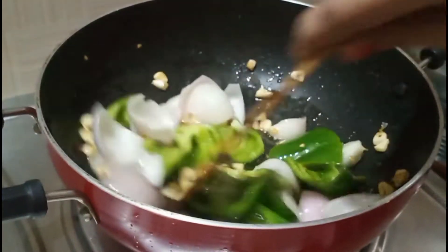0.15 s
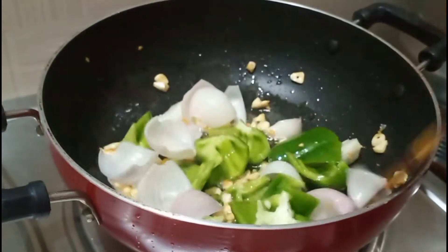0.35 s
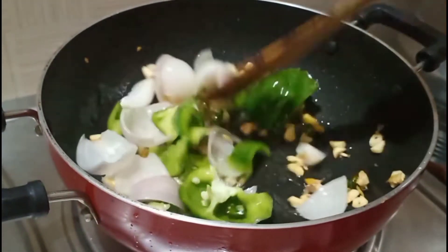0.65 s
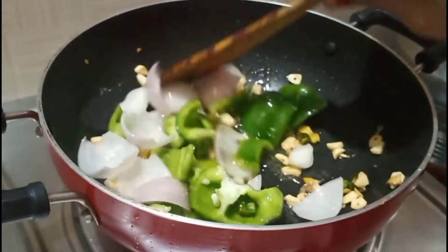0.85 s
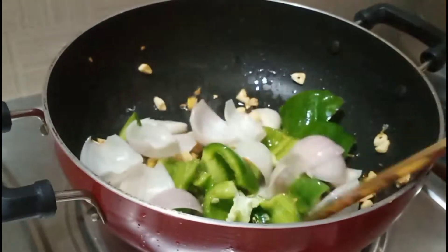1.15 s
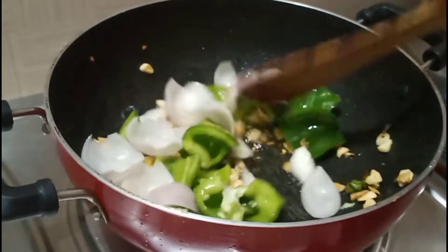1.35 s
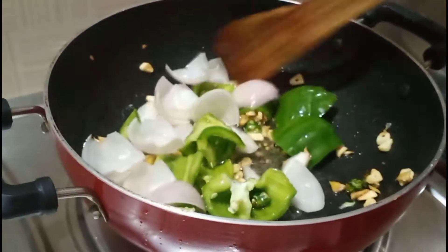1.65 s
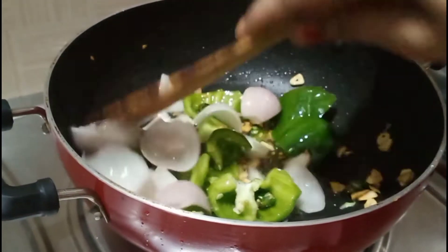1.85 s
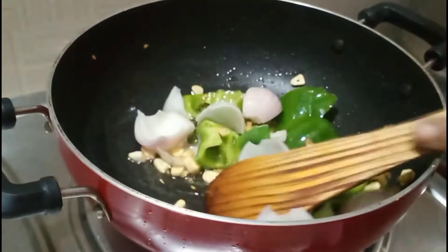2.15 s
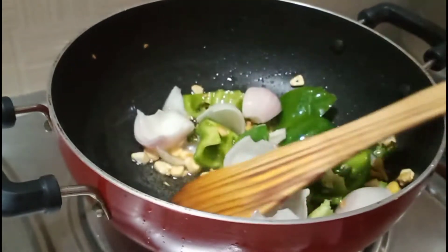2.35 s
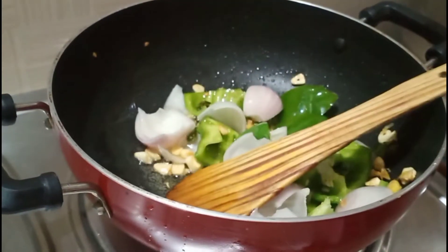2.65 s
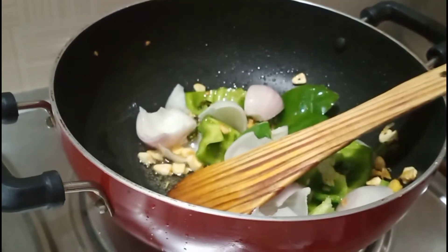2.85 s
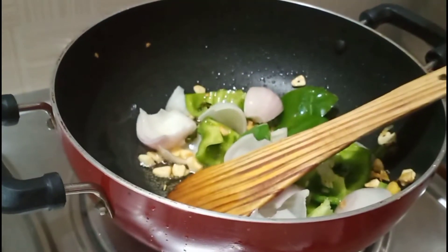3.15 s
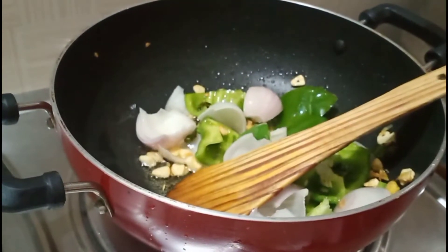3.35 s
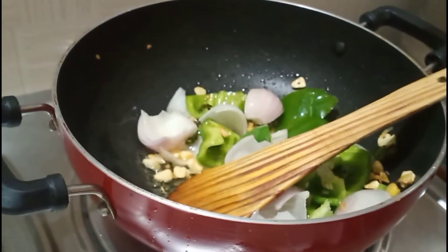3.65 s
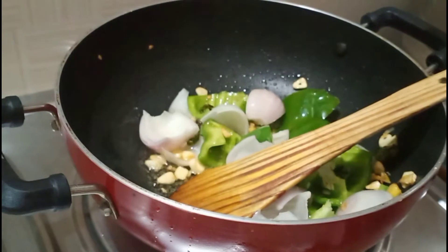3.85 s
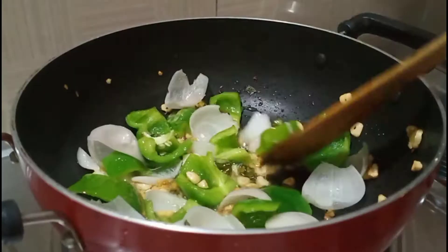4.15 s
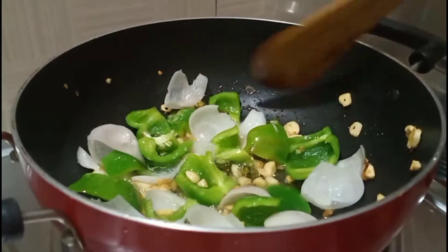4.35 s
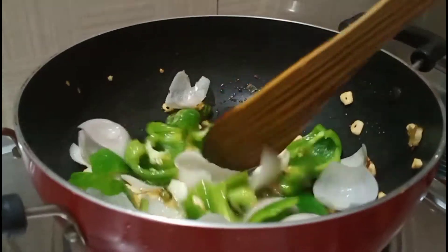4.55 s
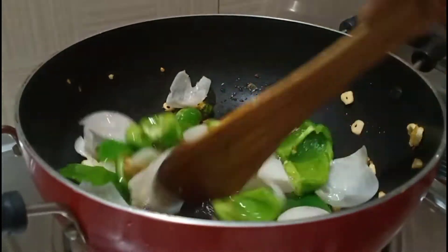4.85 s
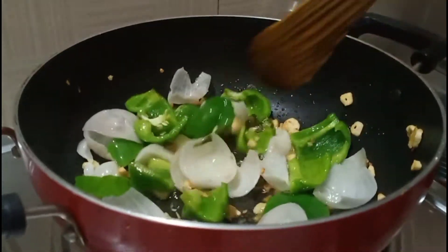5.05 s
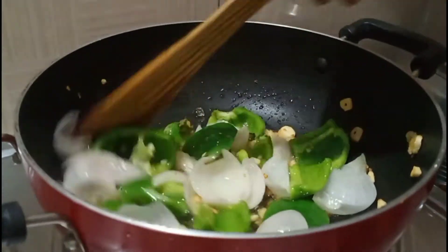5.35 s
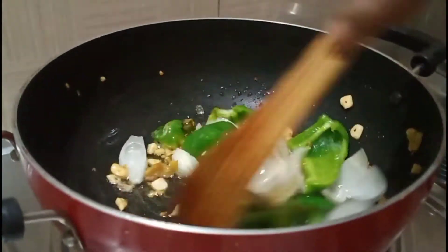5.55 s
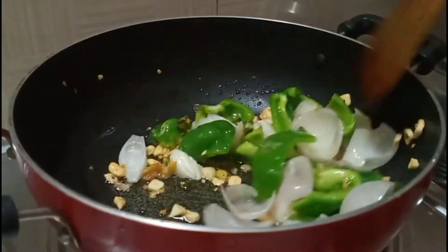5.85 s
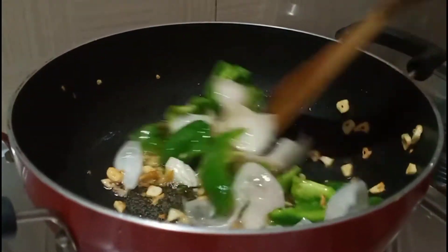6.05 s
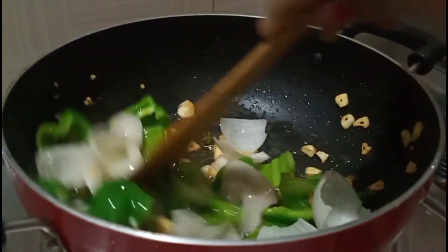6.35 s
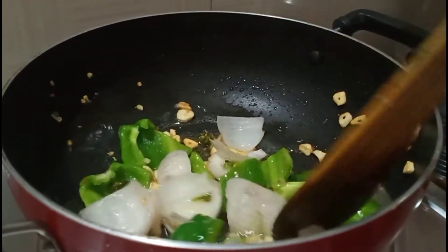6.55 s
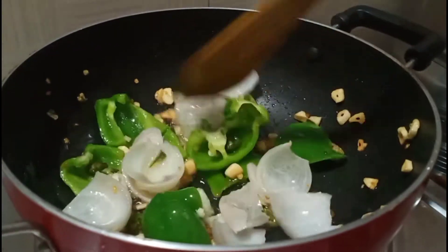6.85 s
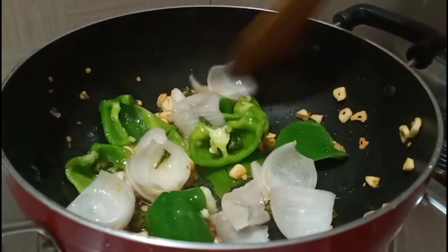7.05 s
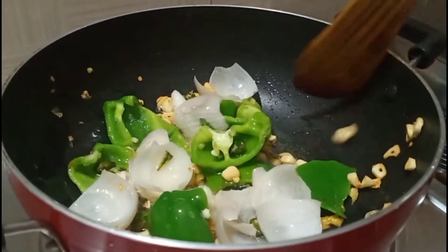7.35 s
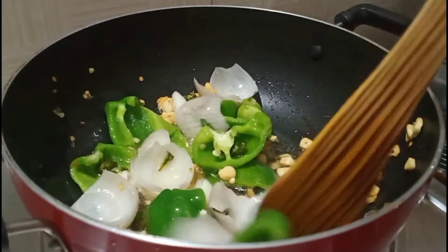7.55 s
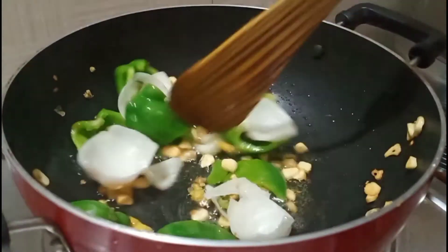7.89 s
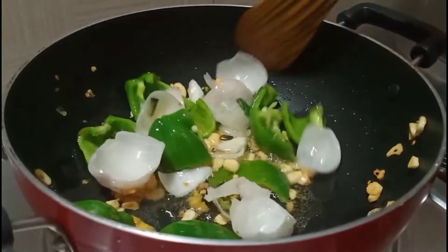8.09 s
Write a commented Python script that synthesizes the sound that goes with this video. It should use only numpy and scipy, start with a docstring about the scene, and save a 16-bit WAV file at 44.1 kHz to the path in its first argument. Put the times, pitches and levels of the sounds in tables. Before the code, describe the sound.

Chopped onion and pepper sizzle in oil while a wooden spatula scrapes and knocks a deep metal pan, with popping drops and one brief silent cut.

```python
"""Close on a deep metal pan, vegetable chunks sizzle in oil from the start over a low kitchen hum.
A wooden spatula scrapes and knocks it at once, ringing its modes; water drops pop as damped tones.
A phone close by hears it through two unlike ports; shortly after 2 s it has turned and the left dulls.
The sizzle sinks; just after 4 s all is cut to silence, then fades in again within half a second.
The sizzle, made of tiny noise bursts and bubble tones, grows again under more knocks, scrapes and rustles."""
import sys
import numpy as np
from scipy import signal
from scipy.fft import rfft, irfft, next_fast_len
from scipy.io import wavfile
from scipy.ndimage import uniform_filter1d, map_coordinates

SR = 44100
rng = np.random.default_rng(int(sys.argv[2]) if len(sys.argv) > 2 else 0)


def file_out(sig):
    """Save sig as 16-bit WAV at sys.argv[1]."""
    # one column per channel
    cols = np.atleast_2d(sig).T
    # limit, then scale
    lim = np.clip(cols, -1, 1)
    pcm = np.round(lim * 32767).astype(np.int16)
    wavfile.write(sys.argv[1], SR, pcm)


N = 362502  # samples

# Source levels are ahead of the port colours and the cut.
# sizzle before its surges: [t/s, bubbling level/dB, fizz level/dB]
SIZZLE_LEVELS = [(0.0, -31, -25.5), (0.25, -31.5, -23.5), (0.41, -32.5, -27.5), (0.61, -31.5, -24.5),
                 (0.76, -37.5, -25.5), (1.06, -33.5, -28.5), (1.19, -40, -31.5), (1.56, -37, -28.5),
                 (2.03, -37, -32), (3.0, -41.5, -36.5), (3.9, -41.5, -34), (4.5, -46.5, -33.5),
                 (4.68, -48.5, -36), (5.06, -43.5, -35.5), (5.48, -48, -36), (5.62, -43.5, -32),
                 (6.03, -37.5, -33), (6.35, -39.5, -29.5), (6.7, -40.5, -33.5), (7.2, -39, -29),
                 (8.22, -42.5, -28.5)]
# colour of the bubbling noise: [f/Hz, level/dB per Hz]
BUBBLING_COLOUR = [(500, -65), (900, -51), (1300, -23.5), (1800, -5), (2150, 6), (3500, 6.5), (4600, 2.5),
                   (5500, -33.5), (8000, -59.5)]
# colour of the fizz: [f/Hz, level/dB per Hz]
FIZZ_COLOUR = [(2500, -30), (4500, -7.5), (6000, -0.5), (10000, 0), (15000, -5.5), (20000, -4)]
# modes of the metal pan: [f/Hz, level/dB, free t60/s]
PAN_MODES = [(204.5, 2, 0.16), (283, 3, 0.11), (350.6, -1.5, 0.12), (418.5, -1.5, 0.53), (510, -3, 0.75),
             (616, -1, 0.42), (658.4, -4, 0.1), (805, 0.5, 0.33), (895, 7.5, 0.18), (1076, 2.5, 0.48),
             (1359, 8.5, .1), (1634, -3.5, 0.11), (2139, 1, 0.16), (2436, -18, 0.13), (2736, 0.5, 0.33),
             (3884, -7.5, 0.12), (4800, -14.5, 0.15)]
# colour of the low rumble: [f/Hz, level/dB per Hz]
RUMBLE_COLOUR = [(20, -30.5), (60, -16), (85, -9), (99, 1.5), (115, -13), (150, -12.5), (200, -9.5),
                 (260, -31.5)]
# rustle of shifting food, ahead of the pan's answer: [t/s, level/dB]
RUSTLE_LEVELS = [(0.0, -41.5), (0.74, -48), (1.0, -45), (1.7, -41.5), (2.7, -47.5), (3.9, -49), (4.5, -46),
                 (4.7, -55), (5.7, -47.5), (6.24, -49), (7.06, -47.5), (7.55, -35), (7.93, -49),
                 (8.22, -40)]
# colour of that rustle: [f/Hz, level/dB per Hz]
RUSTLE_COLOUR = [(150, -5.5), (250, -3.5), (420, 2.5), (700, -4.5), (1100, -10.5), (1500, -1),
                 (1900, -12.5), (2600, -19.5)]
# spatula strokes, and a few soft rustles in the pan: [t/s, hold/s, rasp level/dB, rasp f/Hz,
# shudder level/dB, shudder f/Hz at the start, grit level/dB]
STROKES_AND_RUSTLES = [(0.0, 0.095, -30.5, 970, -71, 400, -30.5), (0.102, 0.049, -22, 643, -15, 430, -32),
                       (0.46, 0.014, -24.5, 766, -17, 530, -30.5), (0.516, 0.08, -32, 960, -47, 331, -26.5),
                       (1.209, 0.1, -32.5, 740, -28, 386, -34.5), (1.709, 0.017, -24, 905, -84, 303, -32),
                       (1.803, 0.046, -26, 680, -59, 590, -29), (1.877, 0.017, -14, 855, -58, 625, -36),
                       (2.1, 0.054, -38.5, 950, -75, 400, -37.5),
                       (2.232, 0.037, -30.5, 1620, -31.5, 454, -53),
                       (4.619, 0.029, -42.5, 1430, -60.5, 407, -52),
                       (5.41, 0.0099, -31.5, 680, -36, 352, -28), (5.451, 0.016, -42, 635, -15, 340, -74),
                       (6.386, 0.0083, -35, 610, -16.5, 580, -35),
                       (6.166, 0.02, -37.5, 1160, -49, 413, -43),
                       (6.825, 0.018, -32.5, 1380, -56, 390, -40)]
# colour of the grit: [f/Hz, level/dB per Hz]
GRIT_COLOUR = [(600, -53.5), (1200, 14.5), (1700, 13), (2800, 5.5), (4500, -4.5), (9000, -6.5)]
# bursting water drops and a few short surges of the sizzle: [t/s, level/dB, f/Hz]
DROPS_AND_SURGES = [(0.02, -22, 2450), (0.2182, -22, 2670), (0.469, -6, 8550), (0.531, -25, 2980),
                    (0.591, -27.5, 2600), (0.6715, -15.5, 4270), (0.7686, -17, 3880), (0.766, -41.5, 900),
                    (0.8383, -21, 7600), (0.967, -13.5, 2590), (1.35, -19, 3680), (1.358, -27, 3600),
                    (1.363, -27.5, 3700), (1.537, -30, 7430), (1.997, -21.5, 1416), (2.078, -18.5, 2700),
                    (2.2626, -25.5, 7740), (2.59, -27.5, 8000), (2.814, -20, 2280), (2.8351, -15, 3570),
                    (3.1287, -19.5, 1350), (3.2543, -21, 2760), (3.267, -18, 907), (3.287, -11, 11300),
                    (3.2883, -19.5, 3580), (3.5783, -18.5, 2730), (3.635, -20.5, 7200),
                    (3.698, -21.5, 7560), (3.706, -20, 2720), (3.781, -26, 7140), (3.8209, -18.5, 2260),
                    (3.8913, -18, 2430), (3.899, -25, 854), (3.965, -26, 7200), (4.53, -19.5, 6840),
                    (4.5882, -28.5, 6900), (4.7041, -24, 6950), (4.8537, -26, 2700), (5.176, -20.5, 5070),
                    (5.5695, -15, 8150), (5.7312, -29, 2080), (5.7304, -22, 7260), (5.764, -20.5, 7400),
                    (6.4906, -21, 7280), (6.586, -22, 3660), (6.736, -25, 1970), (6.8077, -19, 7250),
                    (6.823, -33, 1380), (6.864, -26, 3400), (6.918, -23, 3970), (7.024, -24.5, 3000),
                    (7.1322, -13, 7000), (7.226, -14, 5300), (7.4795, -13.5, 6800), (7.522, -10.5, 7450),
                    (7.68, -27, 810), (7.975, -23, 2640), (8.0315, -18, 3870), (8.046, -18, 2920),
                    (8.104, -24, 2690)]
# knocks on the pan: [t/s, share of the free ring time, crack level/dB, rise/s,
# then level/dB and favoured f/Hz of the low, middle and high modes]
KNOCKS = [(0.075, 0.86, -17.5, 0.00066, -22, 604, -11, 1600, -16, 2320),
          (0.112, 1.14, -2, 0.0015, -7, 617, -19, 860, -20.5, 2770),
          (0.4483, 1.3, -18.5, 0.001, -29, 643, -28, 1080, -24, 2090),
          (0.5039, 0.46, -11, 0.00068, -18, 650, -14, 820, -14, 2410),
          (0.563, 0.8, -25.5, 0.0017, -50, 288, -20.5, 890, -23, 2100),
          (0.657, 0.36, -7.5, 0.0013, -45, 660, -25.5, 880, -18, 2380),
          (1.192, 0.43, -40, 0.0034, -6.5, 420, -17, 1600, -19, 2130),
          (1.2788, 0.36, -13.5, 0.00054, -28, 283, -13.5, 840, -11.5, 2400),
          (2.196, 1.6, -22.5, 0.003, -49, 430, -25.5, 1620, -22, 2460),
          (2.25, 2.1, -37.5, 0.0065, -26.5, 406, -51, 880, -30, 2130),
          (4.368, 0.92, -20, 0.0019, -38, 524, -35.5, 1400, -44, 2500),
          (4.458, 1.24, -15, 0.0015, -18.5, 442, -23.5, 810, -29, 2480),
          (4.8335, 1.4, -35.5, 0.0048, -27, 312, -38.5, 1240, -50, 2750),
          (5.175, 0.88, -15, 0.0031, -15.5, 446, -26, 1530, -18.5, 3860),
          (5.4028, 0.44, -17.5, 0.002, -19, 510, -16, 1280, -19, 2050),
          (5.439, 2.4, -6, 0.002, -5.5, 724, -28.5, 1400, -21, 3850),
          (5.9578, 0.61, -17.5, 0.0012, -17.5, 423, -21, 1090, -6, 2280),
          (5.968, 1.96, -20.5, 0.0043, -21, 480, -21, 1260, -40, 2750),
          (6.337, 1.4, -30, 0.0074, -37, 533, -25, 1300, -40, 2750),
          (6.3725, 0.99, -10, 0.00077, -17.5, 585, -29, 1400, -32, 2100),
          (6.8348, 0.44, -20, 0.0012, -45, 290, -30, 1390, -33, 2100),
          (7.0828, 1.76, -7, 0.00061, -21.5, 475, -19, 1070, -17.5, 2950),
          (7.4285, 1.05, -13, 0.0025, -12.5, 440, -19, 1080, -13, 2130),
          (7.438, 0.56, -12.5, 0.0027, -28, 430, -12.5, 1070, -5.5, 2130),
          (7.6707, 0.63, -18, 0.0013, -33, 510, -30, 1380, -26, 3820),
          (1.229, 2.2, -41, 0.0044, -18, 270, -45, 1380, -45, 2130),
          (1.257, 1.6, -42.5, 0.0058, -24, 283, -43, 1380, -45, 2130),
          (7.313, 0.62, -36, 0.0013, -59, 430, -32, 1520, -37, 2100),
          (7.802, 0.44, -44, 0.0023, -29.5, 418, -54, 1080, -55, 2130),
          (8.145, 0.84, -16, 0.0027, -32, 430, -38, 1090, -45, 2130),
          (8.177, 0.73, -40, 0.0048, -47, 430, -35, 1070, -48, 2130)]
# dying away of the kitchen echo: [f/Hz, t60/s]
KITCHEN_DECAY = [(200, 0.1), (2000, 0.29), (10000, 0.039)]
# colour of the left microphone port: [f/Hz, level/dB]
LEFT_PORT = [(300, -15.5), (1200, -7.5), (2200, 4), (3300, 1.5), (4400, -1.5), (6000, -18), (8000, -27.5),
             (11000, -25.5), (12500, -13), (15400, -12.5), (15600, -33)]
# colour of the right microphone port: [f/Hz, level/dB]
RIGHT_PORT = [(300, -16), (1200, -7.5), (2200, -3.5), (3300, 0), (5000, -3), (6500, -3), (7600, 5),
              (9000, -4), (11000, -7.5), (15000, -4), (15800, -26)]
# gain through the cut and the fade-in: [t/s, level/dB]
CUT_GAIN = [(4.06, 0), (4.075, -37.5), (4.098, -61), (4.1, -120), (4.188, -120), (4.195, -35), (4.24, -20),
            (4.252, -11.5), (4.37, -8), (4.55, 2)]

HUM_DB, HUM_FOLLOWS = -50, 0.26  # ahead of the tone and rumble gains; dB for each dB of bubbling
SHAKE_DB, SHAKE_S = -11.5, 0.29  # a shudder shakes the stove: rumble relative to it, and its spread in time
PRESS_DB_PER_S, LIFT_DB_PER_S, GRIT_LIFT_DB_PER_S = 614, 224.5, 148  # how fast each row swells and dies
SAG_PER_S = 5.6  # exponential sinking of the shudder's pitch
SPLUTTER_S, SPLUTTER_HZ = 0.07, 3000  # t60 at this pitch; higher pops die sooner
SPLUTTER_DB, SPLUTTER_GROWS = -33, 0.6  # after a pop of -27 dB; dB for each dB of the pop
LINGER, THUD_S = 0.8, 0.049  # lingering weight against 1 for the quick part; extra t60 of the quick part
LAG_S = 10 / SR  # the left port is further from the pan
TURN_S, TURN_LASTS_S = 2.15, 0.16  # end and length of the phone's turn
OPEN_DB, OPEN_HZ = 9, 6460  # treble lift at the left port before the turn, and where it begins
TOP_HZ = 15800  # band limit


def amp(db):
    """dB to gain."""
    return np.exp(np.asarray(db) * np.log(10) / 20)


def unit(x):
    """Scaled to rms 1."""
    return x / np.sqrt(np.mean(x ** 2) + 1e-20)


def along(points, hz):
    """(Hz, value) points read on a log axis."""
    f, v = np.transpose(points)
    return np.interp(np.log(hz + 1), np.log(f + 1), v)


def curves(rows):
    """One value per sample for each column after the time."""
    s, *cols = np.transpose(rows)
    return [np.interp(np.arange(N) / SR, s, c) for c in cols]


def wobble(rate):
    """A smooth random curve, rate knots a second."""
    coarse = np.arange(0, N + 32, 32)
    knots = rng.standard_normal(int(N * rate / SR) + 4)
    return np.interp(np.arange(N), coarse, map_coordinates(knots, [coarse * rate / SR]))


def filtered(x, response):
    """x times a complex response of frequency."""
    m = next_fast_len(N + SR // 2)
    return irfft(rfft(x, m) * response(np.fft.rfftfreq(m, 1 / SR)), m)[..., :N]


def pan_response(hz, low, high, widen):
    """The pan's modes between low and high Hz as damped resonances, alternating in sign."""
    total = 0
    for k, (centre, db, t60) in enumerate(PAN_MODES):
        if low < centre < high:
            damping = 1j * hz * widen / t60
            total = total - (-1) ** k * amp(db) * damping / (centre * centre - hz * hz + damping)
    return total


def crackle(spectrum, per_s, spread_db, share, patchy_db, life_s):
    """Two streams of tiny bursts of uneven size over patchy noise, coloured, rms 1."""
    z = signal.stft(rng.standard_normal((2, N)), nperseg=256)[2]
    field = uniform_filter1d(rng.standard_normal(z.shape[1:]), size=4, axis=0)
    field = uniform_filter1d(field, size=12, axis=1)
    bed = signal.istft(z * amp(patchy_db * unit(field)), nperseg=256)[1][:, :N]
    # both ports hear a burst at the same moment, with unrelated fine detail
    struck = rng.random(N) < per_s / SR
    sizes = struck * amp(spread_db * np.minimum(rng.exponential(size=N), 3.6))
    fading = signal.lfilter([1], [1, -np.exp(-1 / (life_s * SR))], sizes)
    bursts = fading * rng.standard_normal((2, N))
    return unit(filtered(unit(bed) + share * unit(bursts), lambda hz: amp(along(spectrum, hz))))


def bubbles(per_s, centre_hz, cycles, spread_db):
    """Single bubbles as short rising tones, each at its own pitch, size and side; rms 1."""
    count = int(per_s * N / SR)
    when, side = rng.random((2, count, 1))
    hz = centre_hz * np.exp(0.2537 * rng.standard_normal((count, 1)))
    size = amp(spread_db * np.minimum(rng.exponential(size=(count, 1)), 3))
    turns = hz * np.arange(400) / SR
    envelope = np.exp(-turns / cycles) * (1 - np.exp(-turns))
    tone = size * np.sin(2 * np.pi * turns * (1 + 0.0073 * turns)) * envelope
    at = ((when * N).astype(int) + np.arange(tone.shape[1])).ravel()
    ports = [(tone * np.cos(np.pi * (side + shift))).ravel() for shift in (0, 0.5)]
    return unit(np.array([np.bincount(at, port, N)[:N] for port in ports]))


def sizzle():
    """Steam bubbles burst in oil: larger ones bubble and set the pan humming, small ones fizz; both surge."""
    bubbling_db, fizz_db = curves(SIZZLE_LEVELS)
    surge_db = 1.5 * wobble(12) + 1.1 * wobble(40)
    bubbling = crackle(BUBBLING_COLOUR, per_s=250, spread_db=4.5, share=0.75, patchy_db=3.2, life_s=0.0016)
    bubbling = bubbling + 0.6 * bubbles(per_s=300, centre_hz=2800, cycles=22, spread_db=2.5)
    humming = unit(filtered(bubbling, lambda hz: pan_response(hz, 800, 5000, widen=1.1)))
    bubbling = unit(bubbling + 0.34 * humming)
    fizz = crackle(FIZZ_COLOUR, per_s=200, spread_db=5, share=0.65, patchy_db=2.5, life_s=0.0008)
    fizz_db = fizz_db + 0.48 * surge_db + 1.32 * wobble(7)
    return amp(bubbling_db + surge_db) * bubbling + amp(fizz_db) * fizz


def strokes():
    """Each stroke or rustle swells, holds and dies: gains of rasp, shudder, grit, pitches weighted by gain."""
    columns = np.transpose(STROKES_AND_RUSTLES)[:, :, None]
    s, hold, rasp_db, rasp_hz, shudder_db, shudder_hz, grit_db = columns
    slow = np.arange(0, N + 64, 64)
    since = slow / SR - s

    def shape(lift):
        return -PRESS_DB_PER_S * np.maximum(-since, 0) - lift * np.maximum(since - hold, 0)

    def blend(hz, weight):
        return (hz * weight).sum(axis=0) / weight.sum(axis=0)

    rasp = amp(rasp_db + shape(LIFT_DB_PER_S))
    shudder = amp(shudder_db + shape(LIFT_DB_PER_S))
    grit = amp(grit_db + shape(GRIT_LIFT_DB_PER_S))
    sagging_hz = shudder_hz * np.exp(-SAG_PER_S * np.clip(since, 0, 0.2))
    controls = (rasp.sum(axis=0), blend(rasp_hz, rasp),
                shudder.sum(axis=0), blend(sagging_hz, shudder), grit.sum(axis=0))
    return [np.interp(np.arange(N), slow, c) for c in controls]


def hum():
    """A wavering tone and lumpy rumble, nearly alike at both ports, swell with the bubbling; shudders add rumble."""
    bubbling_db = curves(SIZZLE_LEVELS)[0]
    tone_hz = 184.5 + 1.497 * wobble(4.2)
    tone = np.sin(2 * np.pi * np.cumsum(tone_hz) / SR) * amp(3 * wobble(9))
    noise = filtered(rng.standard_normal((3, N)), lambda hz: amp(along(RUMBLE_COLOUR, hz)))
    rumble = unit(noise[0] + 0.25 * noise[1:])  # one shared stream and a little of each port's own
    lumps = amp(4.5 * wobble(8.8) + 2.5 * wobble(3.2))
    shake = amp(SHAKE_DB) * uniform_filter1d(strokes()[2], int(SHAKE_S * SR))
    hum_db = HUM_DB + HUM_FOLLOWS * (bubbling_db - bubbling_db.mean())
    return amp(hum_db) * (2.63 * tone + 3.1 * lumps * rumble) + shake * rumble


def rustle():
    """Shifting food rustles in patches and nudges the pan, whose modes answer."""
    food = crackle(RUSTLE_COLOUR, per_s=15, spread_db=-2, share=0.1, patchy_db=4.5, life_s=0.0062)
    food = food + 0.5 * food[::-1]  # each port hears some of the other
    answered = filtered(food, lambda hz: 1 + 1.36 * pan_response(hz, 250, 1800, widen=4.8))
    return amp(curves(RUSTLE_LEVELS)[0]) * answered


def gliding(x, centre_hz, octaves):
    """x through a band whose centre moves with time."""
    hz, t, z = signal.stft(x, SR, nperseg=512)
    centre = np.interp(t * SR, np.arange(N), centre_hz)
    distance = np.log2((hz[:, None] + 1) / centre) / octaves
    return signal.istft(z / (1 + distance ** 2), SR, nperseg=512)[1][..., :N]


def scrape():
    """The wooden edge sticks and slips: grainy friction through damped pan modes; soft rustles likewise."""
    rasp, rasp_hz, shudder, shudder_hz, crunch = strokes()
    slips = rng.standard_normal((3, N)) * amp(0.33 * wobble(63))
    slips = slips[0] + 0.18 * slips[1:]
    rasping = filtered(slips, lambda hz: pan_response(hz, 550, 1800, widen=53))
    rasping = unit(gliding(rasping, rasp_hz, octaves=0.28))
    shuddering = filtered(slips, lambda hz: pan_response(hz, 150, 700, widen=4.0))
    shuddering = unit(gliding(shuddering, shudder_hz, octaves=0.59))
    # crumbs catching under the edge crunch brightly
    grit = crackle(GRIT_COLOUR, per_s=250, spread_db=3, share=1.0, patchy_db=3.5, life_s=0.0015)
    return rasp * rasping + shudder * shuddering + crunch * grit


def pops():
    """A drop bursts with a click, damped cycles and a splutter around that pitch; short surges likewise."""
    out, t = np.zeros((2, N + SR)), np.arange(SR // 12) / SR
    for s, db, hz in DROPS_AND_SURGES:
        burst = np.sin(2 * np.pi * hz * t) * 1.1 * np.exp(-t * hz / 6.1) * (1 - np.exp(-t * hz * 1.6))
        pole = np.exp(-np.pi * 0.5 * hz / SR)
        resonance = [1, -2 * pole * np.cos(2 * np.pi * hz / SR), pole * pole]
        band = signal.lfilter([1, 0, -1], resonance, rng.standard_normal((2, len(t))))
        click = 1.5 * np.sqrt(hz / 8000) * amp(-60 * t / 0.00054) * rng.standard_normal(len(t))
        t60 = SPLUTTER_S * (SPLUTTER_HZ / hz) ** 0.19
        splutter = amp(SPLUTTER_DB + SPLUTTER_GROWS * (db + 27) - 60 * t / t60) * unit(band)
        out[:, round(s * SR):][:, :len(t)] += amp(db) * (burst + click) + splutter
    return out[:, :N]


def clack(f):
    """Crack colour: a broad band plus the pan's modes, heavily damped under the wood."""
    broad = 1j * f / (900 + 1j * f) / (1 + 1j * f / 9000)
    return broad + 0.34 * pan_response(f, 300, 5000, widen=70.0)


def knocks():
    """Each knock rings the pan's modes under a short crack; where it lands decides which are favoured."""
    ringing, cracks = np.zeros((2, 2, N + SR))
    t = np.arange(SR // 6) / SR
    hz, mode_db, t60 = np.transpose(PAN_MODES)[:, :, None]
    group = np.digitize(hz, [750, 1800])  # low, middle, high
    for s, free, db, rise, *modes in KNOCKS:
        group_db, favoured_hz = np.reshape(modes, (3, 2)).T[:, group]
        off_favour_db = np.minimum(45 * np.abs(np.log2(hz / favoured_hz)), 15)
        level = mode_db + group_db - off_favour_db + rng.normal(0, 1.2, hz.shape)
        # each mode flutters at random while it dies, faster the shorter it rings
        knots = rng.standard_normal((len(PAN_MODES), 300)) * (np.arange(300) > 0)
        flutter = np.array([np.interp(t * 27 / life, np.arange(len(k)), k) for life, k in zip(t60, knots)])
        onset = (1 - np.exp(-t / rise)) ** 2
        # wood and food quickly swallow part of the swing; the rest lingers
        fade = amp(-60 * t / (t60 * free)) * (LINGER + amp(-60 * t / (THUD_S * free)))
        swing = amp(level + 3 * flutter) * fade * onset * (1 - (t / t[-1]) ** 2)
        # the high modes reach the two ports out of step
        step = rng.normal(0, 1, hz.shape) * hz / 2500
        phase = 2 * np.pi * hz * t + 0.8 * flutter[::-1]
        rung = [(swing * np.sin(phase + side * step)).sum(axis=0) for side in (0.5, -0.5)]
        ringing[:, round(s * SR):][:, :len(t)] += rung
        crack_fade = amp(-60 * t / 0.017) + 0.28 * amp(-60 * t / 0.21 + 2.2 * flutter[-1])
        crack = rng.standard_normal((2, len(t))) * np.sqrt(onset) * crack_fade
        cracks[:, round(s * SR):][:, :len(t)] += amp(db) * crack
    return ringing[:, :N], filtered(cracks[:, :N], clack)


def kitchen(x):
    """Walls answer; each frequency dies at its own speed, with unrelated detail at each port."""
    hz, t, z = signal.stft(rng.standard_normal((2, SR // 2)), SR, nperseg=256)
    decay = amp(-60 * t / along(KITCHEN_DECAY, hz)[:, None])
    tail = signal.istft(z * decay, SR, nperseg=256)[1]
    delayed = np.pad(x, ((0, 0), (200, 0)))  # samples
    return signal.fftconvolve(delayed, tail / np.linalg.norm(tail[0]), axes=1)[:, :N]


def scene():
    """Pan sounds, the cracks and pops with their echo, over sizzle, rustle and hum."""
    ringing, cracks = knocks()
    popping = pops()
    pan = amp([[-0.8], [0.8]]) * (ringing + scrape())  # slightly stronger on the right
    echo = kitchen(amp(-2.5) * cracks + amp(-6) * popping)
    return pan + cracks + popping + echo + sizzle() + hum() + rustle()


def record(dry):
    """Each port has its colour, the left brighter until the turn; the cut and band limit act on both."""
    def ports(hz):
        colour = amp([along(LEFT_PORT, hz), along(RIGHT_PORT, hz)])
        return colour * np.exp(-2j * np.pi * hz * [[LAG_S], [0]])

    heard = filtered(dry, ports)
    treble = heard[0] - signal.filtfilt(*signal.butter(2, OPEN_HZ, fs=SR), heard[0])
    facing = np.clip((TURN_S - np.arange(N) / SR) / TURN_LASTS_S, 0, 1)
    heard = heard + [(amp(OPEN_DB) - 1) * facing * treble, 0 * treble]
    return filtered(heard * amp(curves(CUT_GAIN)[0]), lambda hz: hz < TOP_HZ)


dry = scene()
out = record(dry)
file_out(out)
```